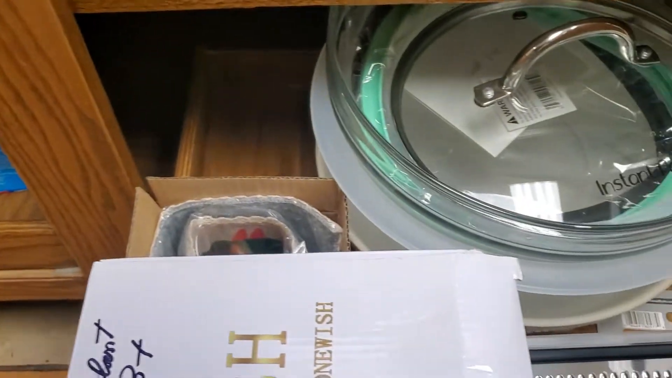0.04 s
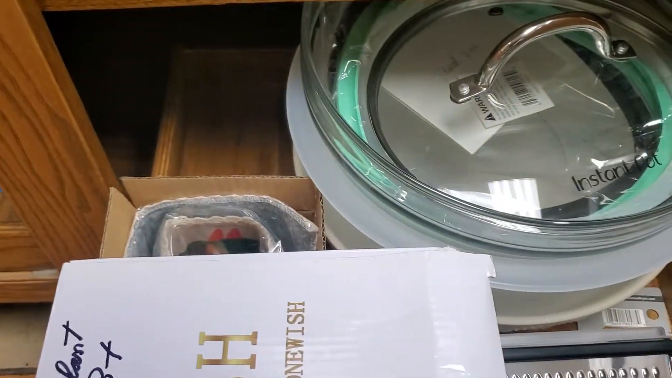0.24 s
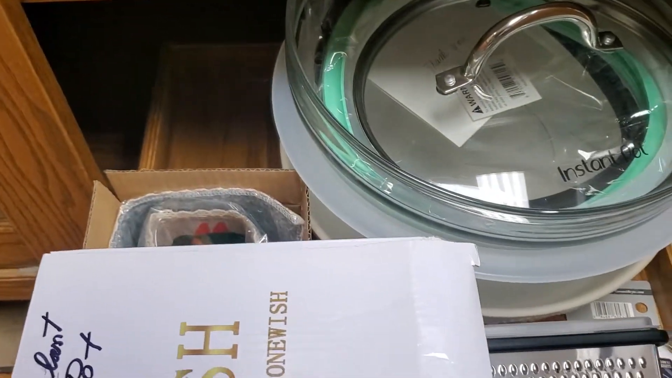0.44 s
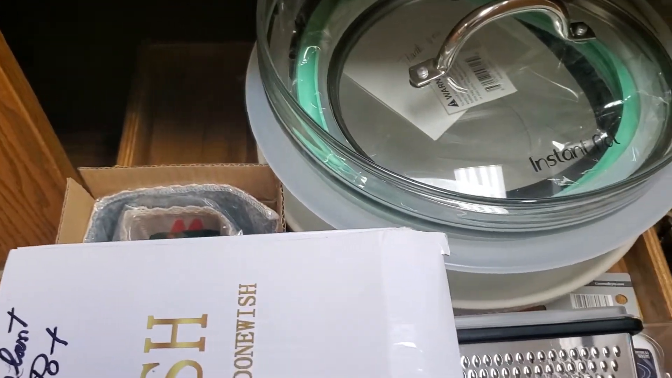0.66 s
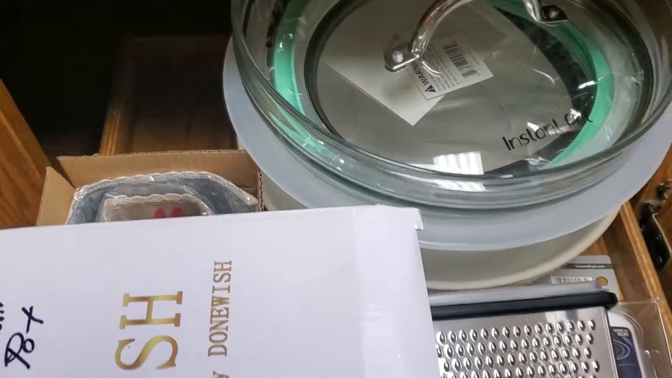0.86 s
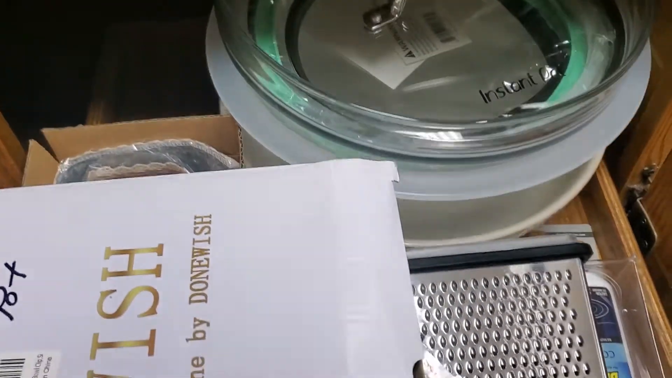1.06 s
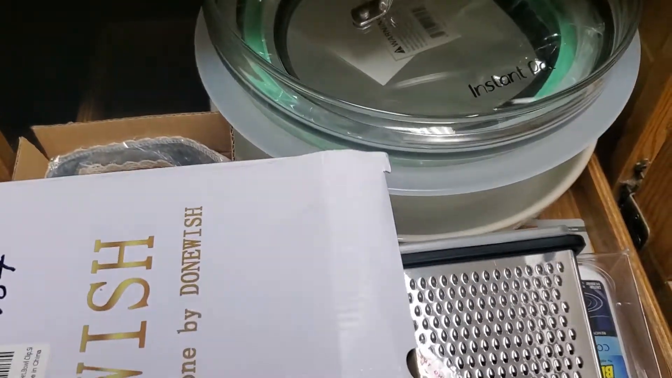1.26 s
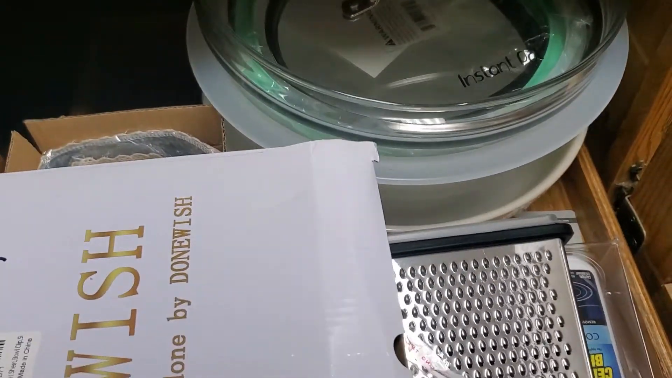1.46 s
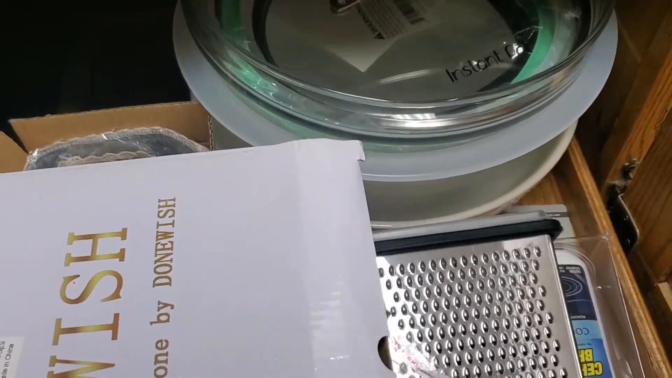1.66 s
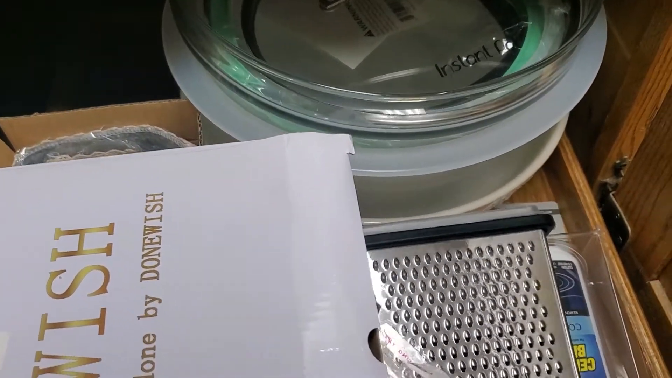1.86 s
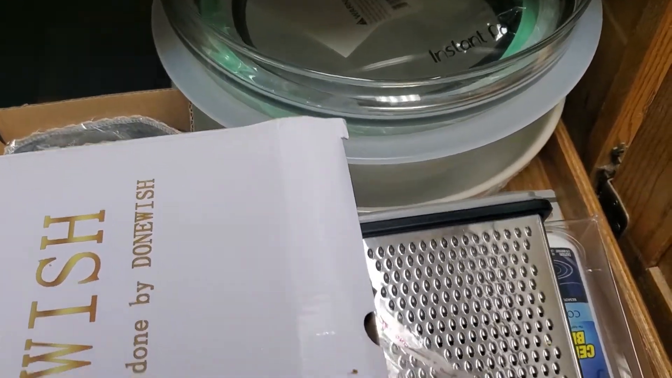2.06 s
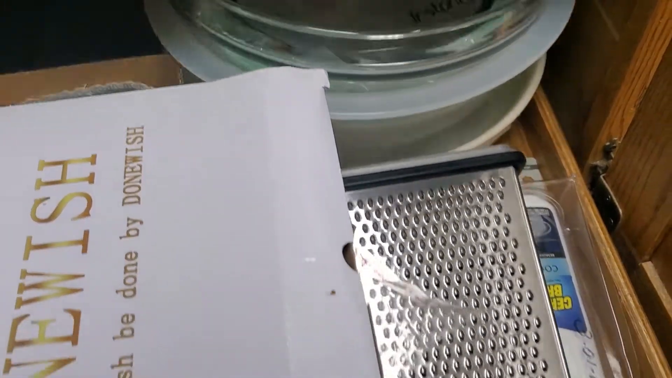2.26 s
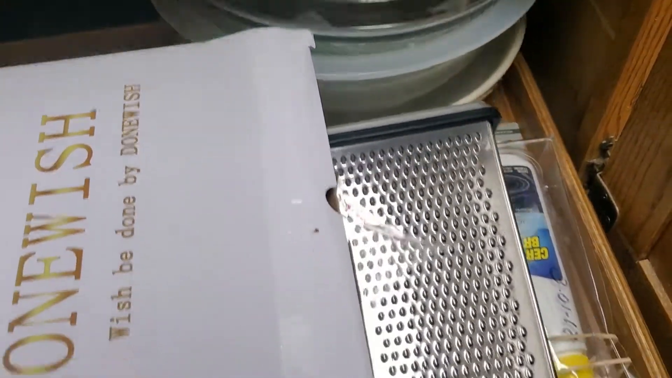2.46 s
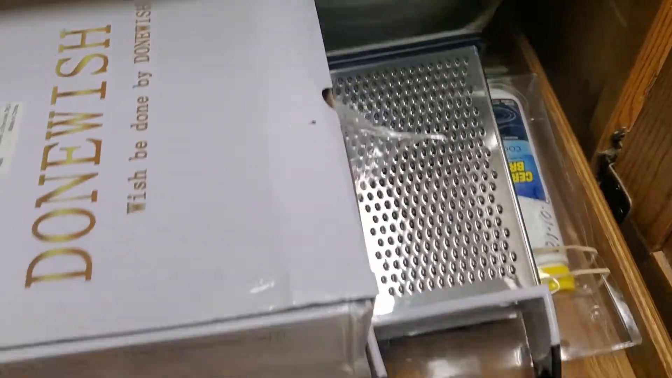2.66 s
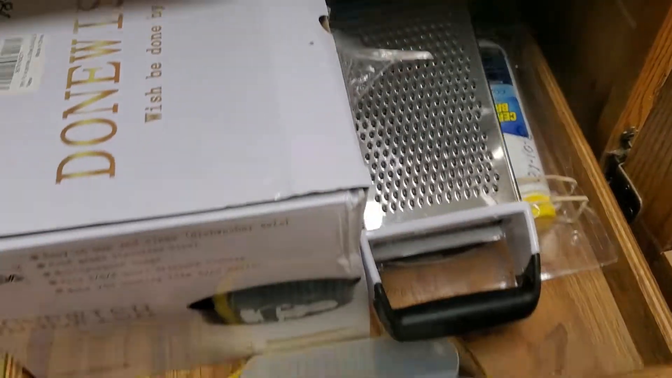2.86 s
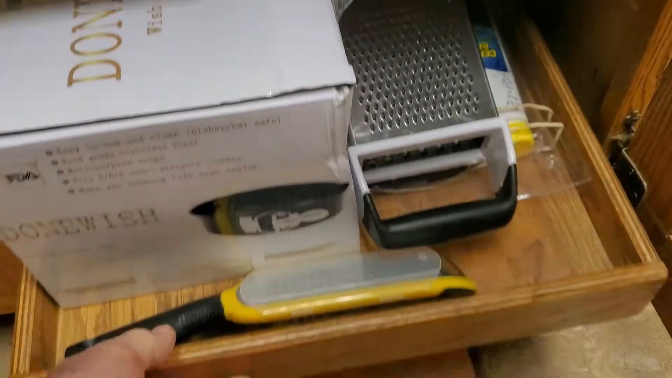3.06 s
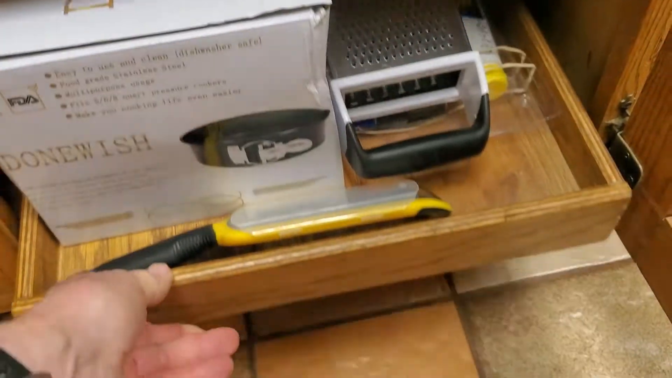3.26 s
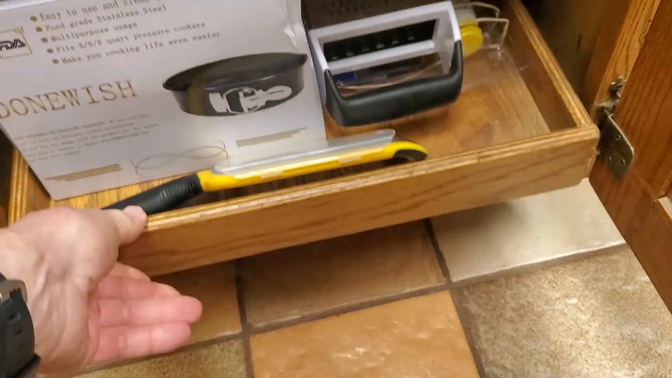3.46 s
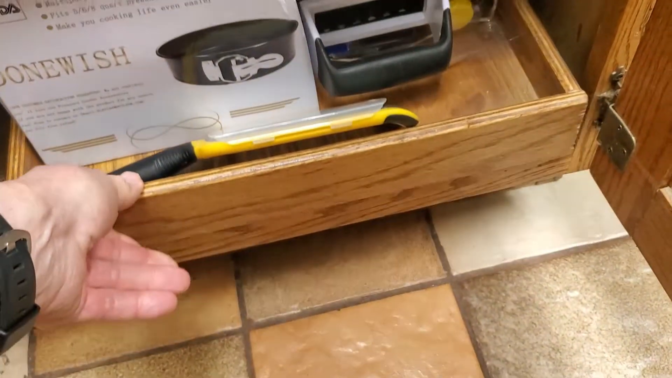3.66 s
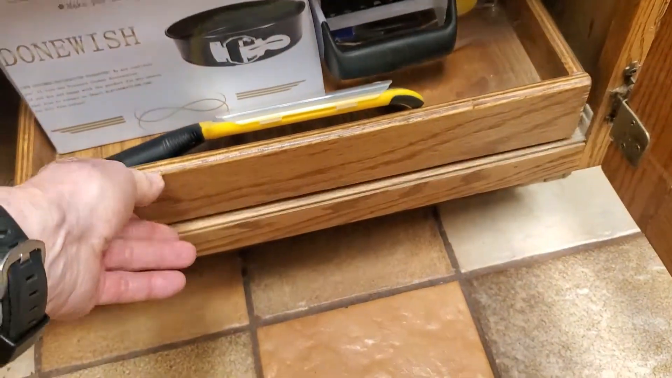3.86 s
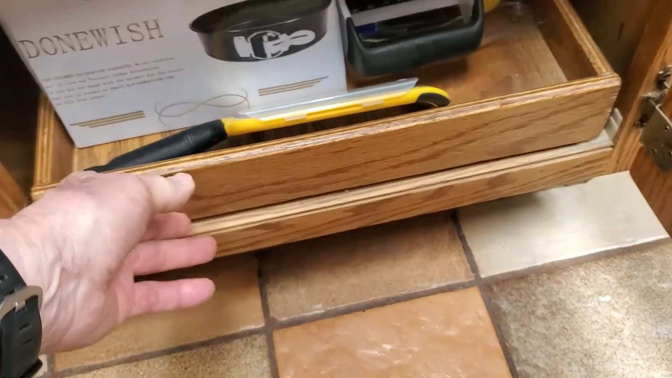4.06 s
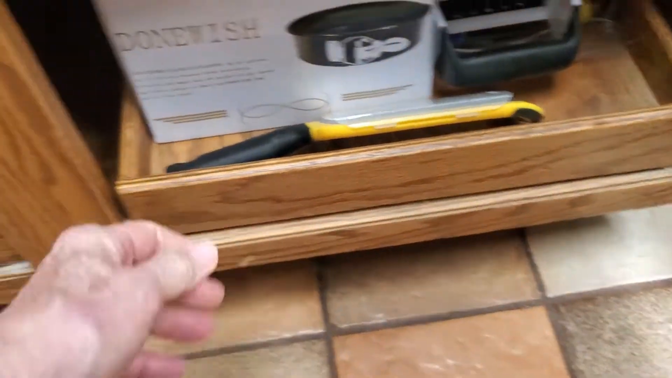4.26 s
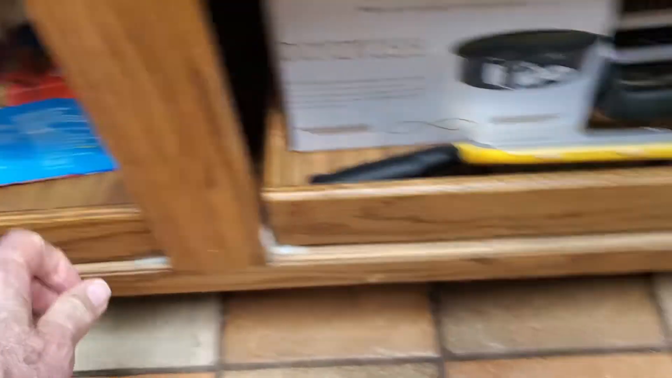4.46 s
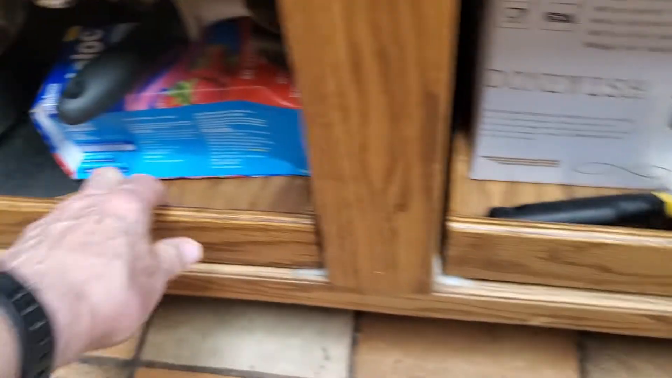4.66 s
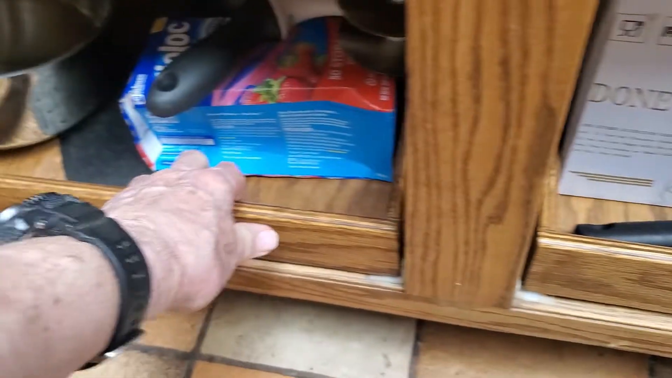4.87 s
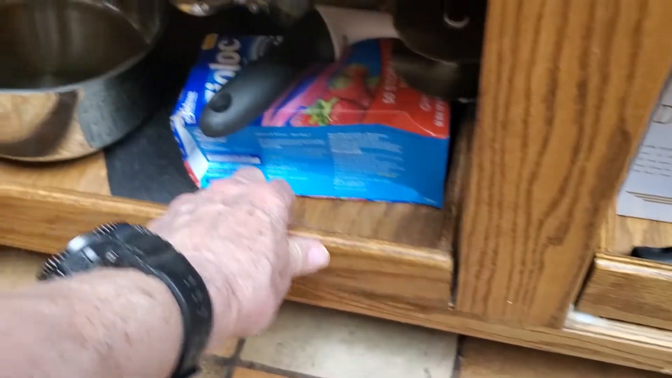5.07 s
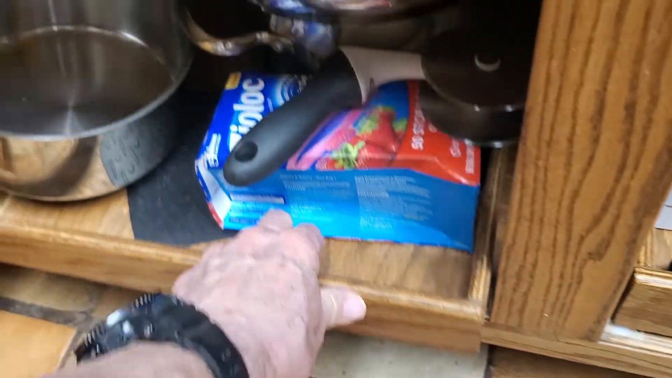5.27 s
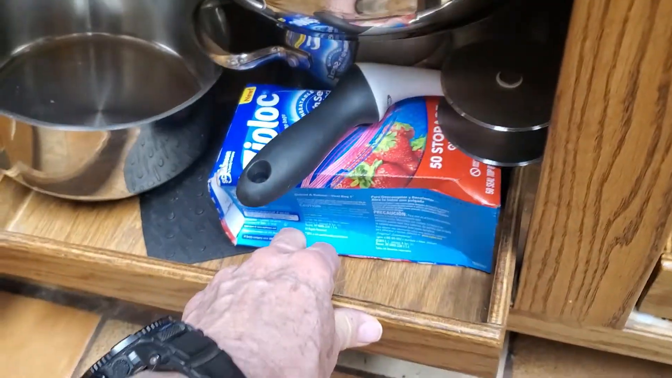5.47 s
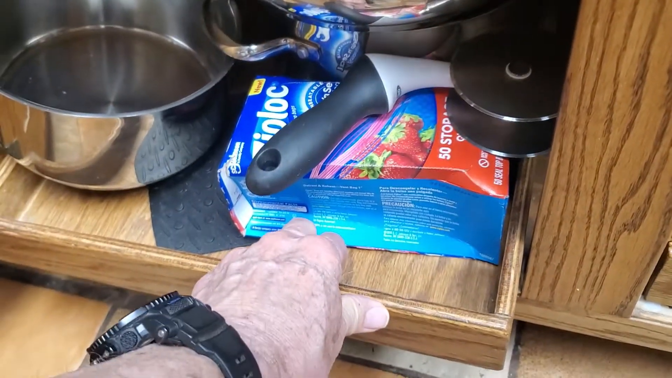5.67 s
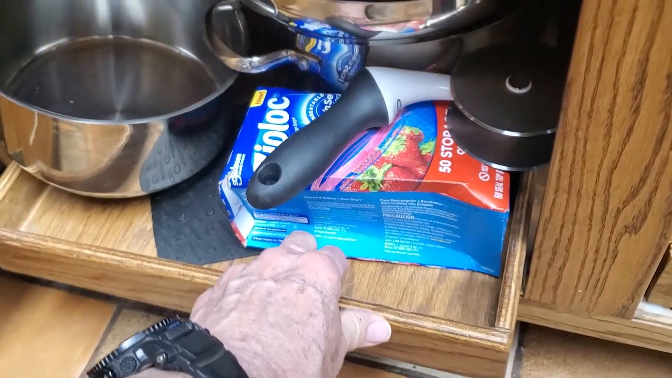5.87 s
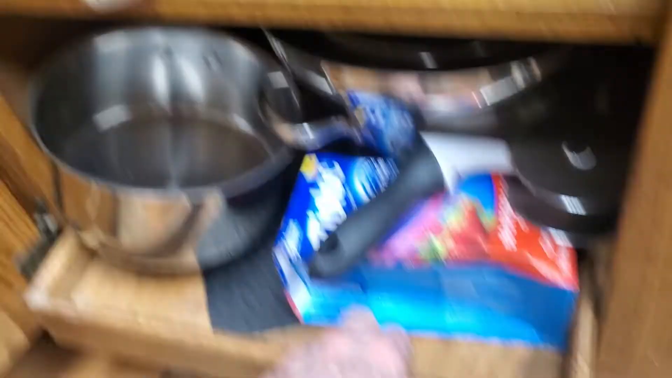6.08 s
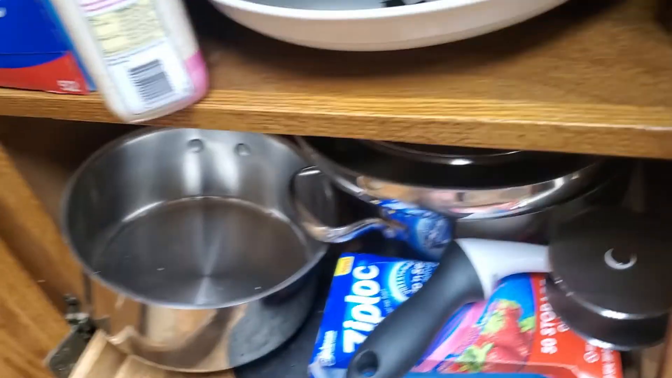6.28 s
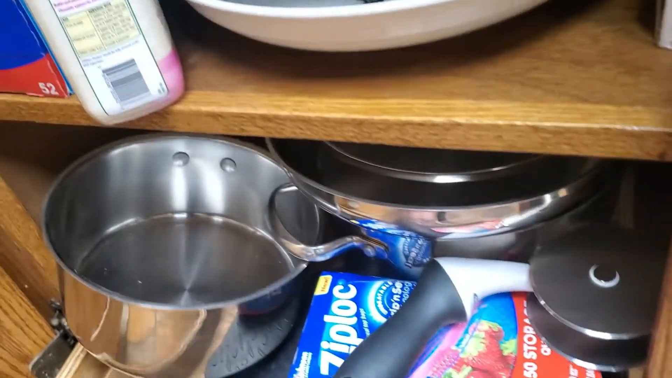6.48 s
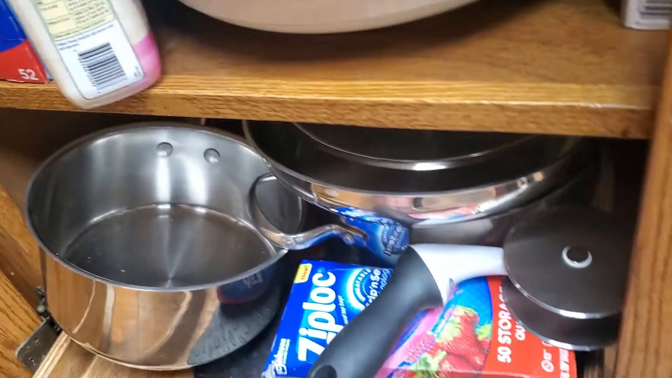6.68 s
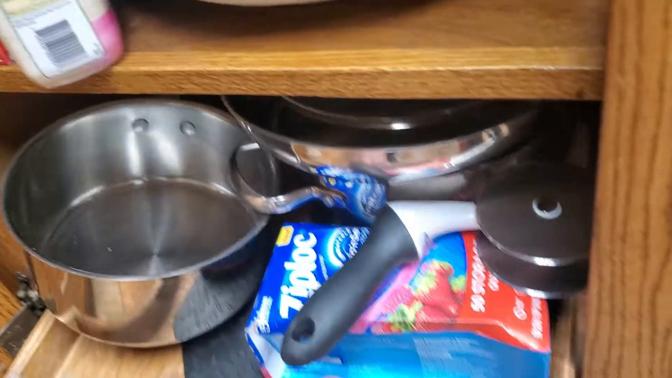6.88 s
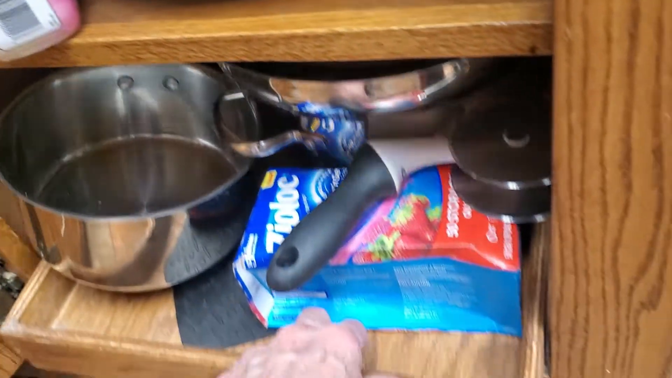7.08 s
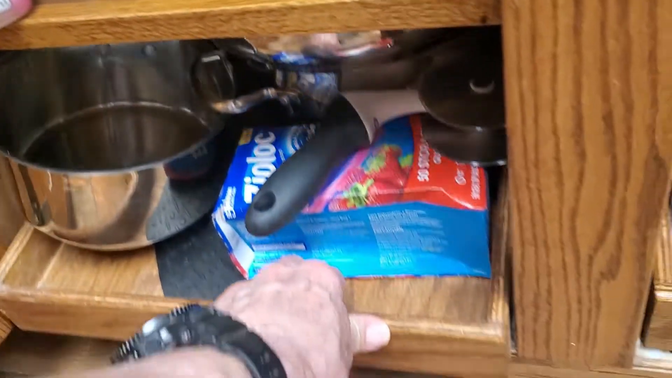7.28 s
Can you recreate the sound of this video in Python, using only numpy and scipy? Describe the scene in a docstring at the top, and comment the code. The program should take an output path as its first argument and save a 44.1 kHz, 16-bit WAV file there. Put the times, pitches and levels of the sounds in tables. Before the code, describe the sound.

Close to a kitchen cabinet, a loaded wooden tray is tugged loose with heavy, boomy knocks, then glides out on rumbling, whirring rollers and hits its stop with a thud. After a pause a second tray rolls out and slams, its steel pots clashing and ringing briefly, before small knocks and a rumble as it starts back. Faint appliance hum beneath, boxy stereo phone sound.

```python
"""Two loaded wooden pull-out trays in a kitchen cabinet, heard from a phone held just above them.
The first is tugged free, rolls out and bumps its stop; the second rolls out, slams so that its steel pots
clash, and starts back. Knocks are coloured noise bursts with ringing modes, boards boom as dying sines,
and rollers rumble as filtered noise and whirr as rough tones. A glass lid tinks; an appliance hums."""
import sys
import numpy as np
from scipy import signal
from scipy.fft import rfft, irfft, next_fast_len
from scipy.io import wavfile
from scipy.ndimage import uniform_filter1d

SR = 44100
rng = np.random.default_rng(int(sys.argv[2]) if len(sys.argv) > 2 else 0)


def transcribe(signal):
    """Save signal, clipped to [-1, 1], as a 16-bit WAV file at the path in sys.argv[1]."""
    frames = np.atleast_2d(signal).T
    limited = np.clip(frames, -1, 1)
    pcm = np.round(limited * 32767).astype(np.int16)
    wavfile.write(sys.argv[1], SR, pcm)


N = 323253
TIME = np.arange(N) / SR


def undb(db):
    """Decibels to gain."""
    return 10 ** (np.asarray(db) / 20)


def level(x, db=0):
    """Scale to an rms level."""
    return x * undb(db) / np.sqrt(np.mean(x ** 2))


def stereo_noise(size=N):
    """Two unrelated white noises."""
    return rng.standard_normal((2, size))


def over_hz(hz, points):
    """Read (Hz, value) points on a log-frequency axis."""
    point_hz, value = np.transpose(points)
    return np.interp(np.log(np.maximum(hz, 1)), np.log(point_hz), value)


def bins(size):
    """Frequencies of a real spectrum."""
    return np.fft.rfftfreq(size, 1 / SR)


def colour(x, points):
    """Causal minimum-phase filter whose gain follows (Hz, dB) points."""
    size = next_fast_len(x.shape[-1] + 4096, True) // 2 * 2
    cepstrum = irfft(np.log(undb(over_hz(bins(size), points))))
    # folding the cepstrum forward makes the filter causal
    cepstrum[1:size // 2] *= 2
    cepstrum[size // 2 + 1:] = 0
    return irfft(rfft(x, size) * np.exp(rfft(cepstrum)))[..., :x.shape[-1]]


def band(x, lo_hz, hi_hz):
    """Band-pass."""
    edges = [lo_hz, min(hi_hz, SR / 2 - 1)]
    return signal.sosfilt(signal.butter(3, edges, "band", fs=SR, output="sos"), x)


def ports(pair, apart_hz=900):
    """Two signals as heard at two close microphone ports: alike in the bass, less so in the treble."""
    mid, side = rfft(pair)
    hz = bins(pair.shape[-1])
    side = side * hz / np.hypot(hz, apart_hz)
    return irfft(np.array([mid + side, mid - side]), pair.shape[-1])


def walk(rate):
    """Random values held 1 / rate s, smoothed twice and scaled to an rms of 1."""
    k = max(int(SR / rate), 1)
    steps = np.repeat(rng.standard_normal(N // k + 1), k)
    return level(uniform_filter1d(uniform_filter1d(steps, k), k)[:N])


def fade(t, t60):
    """Exponential decay by 60 dB in t60 seconds."""
    return np.exp(-np.log(1000) * t / t60)


def add(out, s, x):
    """Mix x in at time s."""
    i = int(s * SR)
    out[:, i:i + x.shape[1]] += x[:, :N - i]


def ring(modes, t, scatter_db=2, apart_hz=1500):
    """Struck modes; each blow weights them anew, and high ones reach the ports out of step."""
    out = 0
    draws = rng.uniform(-1, 1, (len(modes), 2))
    for (hz, db, t60), (size, turn) in zip(modes, draws):
        lag = turn * min(hz / apart_hz, 1) * np.array([[1], [-1]]) * np.pi / 2
        out = out + undb(db + scatter_db * size) * fade(t, t60) * np.sin(2 * np.pi * hz * t + lag)
    return out


# spectrum of the kitchen's quiet air, before it is set to its level: pitch_hz, level_db (relative, per Hz)
AIR_COLOUR = [(18, -40.5), (30, -11.5), (61, -12.5), (73, -9.5), (88, -28.5), (170, -25), (449, -38),
              (486, -41.5), (822, -34), (1190, -42), (1590, -36.5), (2900, -53), (16000, -55)]


def room_air(air_db=-63):
    """Quiet air around the phone: coloured noise that swells slightly and slowly."""
    air = colour(ports(stereo_noise()), AIR_COLOUR) * undb(0.5 * walk(0.73))
    return level(air, air_db)


def appliance_hum(hum_hz=59.8, hum_db=-56, waver_db=0.4):
    """Low hum of an appliance in the room: one sine, wavering in phase and level."""
    hum = np.sin(2 * np.pi * hum_hz * TIME + 0.48 * walk(3.4)) * undb(waver_db * walk(4.5))
    return level(hum, hum_db)


# modes of the glass lid in the first tray: pitch_hz, level_db (relative), t60_s
LID_MODES = [(9830, -6, 0.23), (10160, -4.5, 0.44), (11300, -10, 0.37), (13700, -14, .2)]


def glass_lid(start_s=0.02, level_db=-60.5):
    """One faint tink of the glass lid: its high modes ring and die away."""
    out = np.zeros((2, N))
    add(out, start_s, undb(level_db) * ring(LID_MODES, np.arange(SR // 2) / SR))
    return out


# modes of the steel pots, before their decays are stretched: pitch_hz, level_db (relative), t60_s
POT_MODES = [(969, -5, .72), (1012, -10, .4), (1061, -2, .45), (1394, -5, .25), (1560, -8, .4),
             (1809, -3, .36), (1933, -1, .33), (2040, -8, .42), (2073, -7.5, .7), (2132, -4, .33),
             (2342, -4, .28), (2595, -8, .28), (2842, -8, .5), (2891, -7, .47), (3016, -7, .35),
             (3192, -21, .8), (3650, -8, .37), (3709, -7, .4), (3865, -16, .55), (4017, -10, .28),
             (4215, -18, .5), (4600, -14, .48), (4985, -12, .52), (6075, -18, .45), (6729, -19, .44),
             (9243, -21, .38)]
# blows that set the pots ringing: start_s, level_db (relative)
POT_HITS = [(5.38, -29), (5.404, -35.5)]


def pots(split_hz=7, twin_db=-8, rattle_db=2, sustain=1.23):
    """Steel pots and lids strike each other; being not quite round, each mode beats with a twin."""
    out, t = np.zeros((2, N)), np.arange(SR) / SR
    modes = [(hz, size, t60 * sustain) for hz, size, t60 in POT_MODES]
    twins = [(hz + split_hz * rng.uniform(-2.4, 4.4), size + twin_db, t60) for hz, size, t60 in modes]
    for s, db in POT_HITS:
        add(out, s, undb(db) * (ring(modes, t) + ring(twins, t)))
    # they rock against each other while they ring
    return out * undb(rattle_db * walk(90))


# the first tray's long glide out: start_s, speed (share of its top speed)
GLIDE_SPEED = [(2.091, .02), (2.14, 0.24), (2.3, .6), (2.47, .62), (2.58, 0.42), (2.869, 1), (3.25, .76),
               (3.45, 0.46), (3.581, 0.18), (3.88, 0.17)]


def speed():
    """Speed of the gliding tray, 1 at its fastest; a tiny floor keeps its logarithm finite."""
    s, share = np.transpose(GLIDE_SPEED)
    return np.maximum(np.interp(TIME, s, share, left=0, right=0), 1e-5)


def whirr(rest_hz=504.4, rise_hz=99.5, top_speed_db=-34.5, db_per_decade=33.5, spin_up_s=0.88,
          width_hz=22, mismatch=.048):
    """The left and right rollers each sing a rough narrow tone, higher and louder with the tray's speed."""
    v = speed()
    turn = 2j * np.pi * np.cumsum(rest_hz + rise_hz * v) / SR
    narrow = signal.butter(2, width_hz, fs=SR, output="sos")
    tone = 0
    for ratio in (1 - mismatch, 1 + mismatch):
        noise = stereo_noise() + 1j * stereo_noise()
        # slow noise shifted up to the roller's pitch
        tone = tone + np.real(signal.sosfilt(narrow, noise) * np.exp(ratio * turn))
    spun_up = np.clip((TIME - GLIDE_SPEED[0][0]) / spin_up_s, 0, 1)
    return level(ports(tone), top_speed_db) * undb(db_per_decade * np.log10(v)) * spun_up


# growth of rolling with speed, rows rumble, wood, grit:
# level_db (at top speed, before each band's trim), slope_db (per tenfold speed)
SPEED_GROWTH = [(-31.5, 18.5), (-32.5, 25.5), (-42, 14.5)]
# short shoves in which a tray or its load shifts, before each band's trim:
# start_s, length_s, level_db (wood), grit_db
SHIFTS = [(0.838, 0.22, -54.5, -55.5), (1.086, 0.17, -46, -56), (1.288, 0.38, -56.5, -59),
          (1.51, 0.05, -44.5, -46), (1.708, 0.16, -50, -65), (2.22, 0.25, -41.5, -47.5),
          (4.04, 0.083, -60, -60.5), (4.96, .18, -52.5, -55.5), (5.135, 0.15, -47, -50),
          (5.24, 0.25, -37.5, -38), (5.36, 0.087, -39.5, -24), (5.62, 0.32, -61.5, -63),
          (5.946, 0.205, -69, -74), (6.305, 0.22, -60.5, -63), (6.499, 0.164, -54, -53),
          (6.821, .1, -51, -55.5), (6.917, 0.36, -42, -47)]


def motion(attack_s=0.064, t60_s=0.31, rumble_over_wood_db=6.5):
    """Gains of rumble, wood and grit: they follow the glide's speed, and each shove rises, holds and dies."""
    decades = np.log10(speed())
    power = np.array([undb(db + slope * decades) ** 2 for db, slope in SPEED_GROWTH])
    for start, length, db, grit_db in SHIFTS:
        rise = np.clip((TIME - start) / attack_s, 0, 1)
        push = rise * fade(np.maximum(TIME - start - length, 0), t60_s)
        power += np.outer(undb([db + rumble_over_wood_db, db, grit_db]), push) ** 2
    return np.sqrt(power)


# spectrum of rolling, before its bands are set to their levels: pitch_hz, level_db (relative, per Hz)
ROLLING_COLOUR = [(24, -37.5), (40, -8.5), (75, 8), (147, -9), (243, -4.5), (455, -11.5), (600, -8),
                  (873, -24.5), (1070, -23.5), (1370, -28.5), (4460, -45.5), (6490, -47.5), (7540, -47),
                  (9940, -48.5), (16000, -52)]
# the steel load of the second tray brightens its rasp: pitch_hz, gain_db
STEEL_BRIGHTENING = [(1000, 0.5), (4000, 7.5), (5500, 3), (15000, -3)]
# modes of a wooden tray, also rung by the knocks: pitch_hz, level_db (relative), t60_s (knocks only)
TRAY_MODES = [(116.8, -3, 0.3), (163, -1, 0.18), (208.5, -10.5, 0.32), (237, -13, 0.32), (271.7, -5, 0.18),
              (354, -5.5, 0.13), (412, 1.5, 0.053), (553.6, -5, 0.2), (641, -3, 0.14), (746, -5.5, 0.057),
              (792, -6.5, 0.096), (1410, -3.5, 0.028), (1480, -3, 0.081), (1650, -5, 0.21)]


def rollers(rumble_db=1, wood_db=0, grit_db=-1, bump_db=2.05, grain_db=3.0, modes_share=0.16,
            wander_db=2.0, second_tray_s=4.5):
    """Rollers cross countless small bumps of the rails: the tray rumbles and rings, the bearings rasp."""
    rumble, wood, grit = motion()
    grains = undb(grain_db * np.minimum(rng.exponential(size=N), 6))
    bumps = ports(stereo_noise() * grains)
    roll = colour(bumps * undb(bump_db * walk(45)), ROLLING_COLOUR)
    # the load damps the tray's modes, and shifts from one to another as it moves
    modes = 0
    for hz, db, _ in TRAY_MODES:
        resonance = signal.lfilter(*signal.iirpeak(hz, 20, fs=SR), roll)
        modes = modes + undb(db + wander_db * walk(8.5)) * resonance
    body = level(band(roll, 160, 900)) + modes_share * level(band(modes, 290, 1600))
    rasp = level(band(roll, 935, 20000), grit_db)
    # from second_tray_s on, the second tray is the one that moves
    rasp = np.where(TIME < second_tray_s, rasp, colour(rasp, STEEL_BRIGHTENING))
    bass = level(band(roll, 48, 170), rumble_db)
    return bass * rumble + level(body, wood_db) * wood + rasp * grit


# booms of the loaded trays' boards: start_s, pitch_hz, level_db (before the rise and decay), t60_s
BOARD_BOOMS = [(0.975, 90.7, -25, 0.43), (1.06, 61, -5.5, 0.18), (1.066, 239.4, -20.5, 0.25),
               (1.279, 325, -9.5, 0.042), (1.28, 83.5, -19.5, 0.2), (1.587, 62.9, -9.5, 0.33),
               (1.762, 239, -33.5, 0.13), (1.831, 65.7, -32, 0.24), (3.879, 76.5, -8, 0.26),
               (3.884, 163, -15, 0.17), (4.028, 62.8, -30.5, 0.4), (5.332, 77.2, -10, 0.32),
               (6.503, 510, -34.5, .14), (6.932, 190, -29.5, .3), (6.94, 85, -25.5, 0.31)]


def booms(rise_s=0.0045):
    """After a jolt a board of the tray swings under its load and dies away: one sine each."""
    out, t = np.zeros((2, N)), np.arange(SR // 2) / SR
    for s, hz, db, t60 in BOARD_BOOMS:
        swing = np.sin(2 * np.pi * hz * t)[None]
        add(out, s, undb(db) * (1 - np.exp(-t / rise_s)) * fade(t, t60) * swing)
    return out


def uneven(points, ripple_db, count=90):
    """A smooth (Hz, dB) colour with the peaks and dips of whichever spot is struck."""
    hz = np.geomspace(30, 16000, count)
    ripple = ripple_db * np.minimum(hz / 600, 1) * rng.uniform(-1, 1, count)
    return list(zip(hz, over_hz(hz, points) + ripple))


def contact_chatter(t, grain_db=3, chatter_s=0.0036, contact_t60=0.1):
    """A contact is a ragged run of tiny impacts that lasts chatter_s, then dies away."""
    grains = undb(grain_db * np.repeat(rng.standard_normal(len(t) // 32 + 1), 32)[:len(t)])
    after = np.maximum(t - chatter_s, 0)
    return ports(stereo_noise(len(t))) * level(grains) * fade(after, contact_t60)


# decay of the cabinet and its contents: pitch_hz, t60_s
CABINET_DECAY = [(150, 0.21), (420, 0.24), (1100, 0.16), (3000, .18), (8000, 0.21), (16000, 0.11)]


def lingering(t, cabinet_db=-5, room_db=-32, room_t60=0.27, room_hz=6000):
    """A knock lingers in the cabinet, each band at its own pace, and faintly in the kitchen."""
    hz = bins(len(t))
    centres = np.geomspace(100, 16000, 8)
    # overlapping bands that together pass everything
    shares = [np.interp(np.log(hz + 1), np.log(centres), row) for row in np.eye(len(centres))]
    air = rfft(ports(stereo_noise(len(t))))
    cabinet = sum(irfft(air * share) * fade(t, over_hz(f, CABINET_DECAY))
                  for f, share in zip(centres, shares))
    dull = 1 / (1 + (hz / room_hz) ** 2)  # the kitchen swallows the treble
    return undb(cabinet_db) * cabinet + undb(room_db) * irfft(air * dull) * fade(t, room_t60)


# knocks of trays, rails and load: start_s, level_db (relative), hardness_db (per octave above 700 Hz),
# thud_db (bass added by the weight behind it)
TRAY_KNOCKS = [(0.768, -46.5, -7, -14.5), (0.887, -49.5, -12, 19), (0.971, -27.5, -8, 5.5),
               (1.047, -15.5, -1.95, 4), (1.062, -21.5, -5, 10), (1.208, -43, -8, 1),
               (1.278, -22.5, -13, 4.5), (1.292, -38, -5.5, 2.5), (1.564, -26.5, 0.08, 9),
               (1.587, -28, -9, 12.5), (1.844, -45.5, -12.5, 17.5), (2.101, -45.5, -17, 12),
               (2.133, -36.5, -3.5, -6.5), (2.493, -32.5, -7, 10.5), (3.166, -37.5, -1.5, -5),
               (3.615, -34.5, -4.5, -7), (3.766, -54.5, 0.8, -2), (3.823, -44, -4.5, 16.5),
               (3.877, -21.5, -9, 1), (3.884, -14.5, -6.5, 5.5), (3.914, -29, -4, 2),
               (5.009, -41, -.6, 0.5), (5.064, -35.5, -2.3, -11), (5.244, -31.5, -1, 8),
               (5.281, -36, -2, 6), (5.327, -18, -5, 4), (5.359, -21, -1.5, 12.5), (5.38, -12, -2.5, -1.5),
               (5.401, -14, -2.5, -9.5), (5.424, -25, 0.05, -1), (6.503, -42.5, -4, 5),
               (6.54, -39.5, -15.5, 2), (6.622, -33, -1.5, -3.5), (6.93, -27.5, -1.55, 8.5)]


def knocks(wood_db=-7, clack_db=-1, crack_db=-1, tick_db=-1, modes_db=-5, low_db=-5, rise_s=0.0018,
           ripple_db=5):
    """Each knock chatters for some ms, rings the tray and dies away in the cabinet and the kitchen."""
    out, t = np.zeros((2, N)), np.arange(SR // 2) / SR
    hz = np.array([230, 700, 2500, 10000])  # wood, clack, crack, tick
    octaves = np.log2(np.maximum(hz / hz[1], 1))
    for s, blow_db, hardness, thud_db in TRAY_KNOCKS:
        noise = (contact_chatter(t) + lingering(t)) / 2
        # weight adds bass, a harder contact adds treble
        trims = np.array([wood_db + thud_db, clack_db, crack_db, tick_db])
        levels = blow_db + hardness * octaves + trims
        # a band's level is spread over a width about equal to its centre
        db = levels - 10 * np.log10(2 * hz / SR)
        bass = [(30, db[0] - 39), (75, db[0] + low_db)]
        treble = [(5500, (db[2] + db[3]) / 2), (hz[3], db[3])]
        shape = [*bass, *zip(hz[:3], db[:3]), *treble]
        # the tray's modes follow the levels of the blow
        blow = list(zip(hz, levels))
        modes = [(f, size + modes_db + over_hz(f, blow), t60) for f, size, t60 in TRAY_MODES]
        knock = colour(noise, uneven(shape, ripple_db)) + ring(modes, t)
        add(out, s, knock * (1 - np.exp(-t / rise_s)))
    return out


def panels(x, size=.17, longest_s=.009, lowest_hz=700, count=9):
    """Close cabinet panels throw back short echoes, other ones to each port, which make the sound boxy."""
    out, upper = x.copy(), band(x, lowest_hz, 17000)
    for side in range(2):
        for lag in (rng.uniform(.001, longest_s, count) * SR).astype(int):
            out[side, lag:] += size * upper[side, :N - lag]
    return out


def scene():
    """Room, lid, pots and trays together; the panels echo the rolling and the knocks."""
    background = room_air() + appliance_hum() + glass_lid()
    return background + pots() + whirr() + booms() + panels(rollers() + knocks())


# response of the phone's two microphone ports: pitch_hz, left_db, right_db
PORT_RESPONSE = [(80, 1.96, -1.17), (214, 5.5, 3.5), (850, 1, 0), (2200, 1, -1.5), (3680, 1.5, 2),
                 (5200, -1, -6.5), (6740, 4.5, -12), (7550, -6.5, -11.5), (8800, -2.5, 1), (12000, 2, 0),
                 (14900, 9, -9)]


def record(dry, low_cut_hz=41, top_hz=15900):
    """Each port colours the sound in its own way; the phone cuts the deepest bass and the top."""
    hz, *sides = np.transpose(PORT_RESPONSE)
    heard = np.array([colour(x, list(zip(hz, db))) for x, db in zip(dry, sides)])
    heard = signal.sosfilt(signal.butter(3, low_cut_hz, "high", fs=SR, output="sos"), heard)
    return signal.sosfilt(signal.ellip(8, .2, 70, top_hz, fs=SR, output="sos"), heard)


dry = scene()
out = record(dry)
transcribe(out)
```